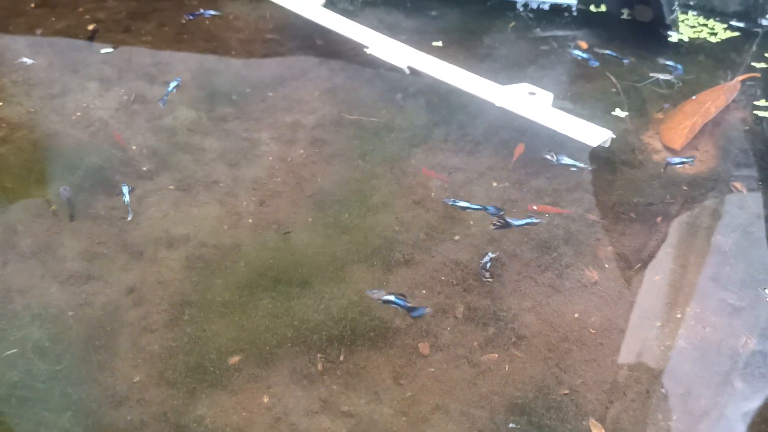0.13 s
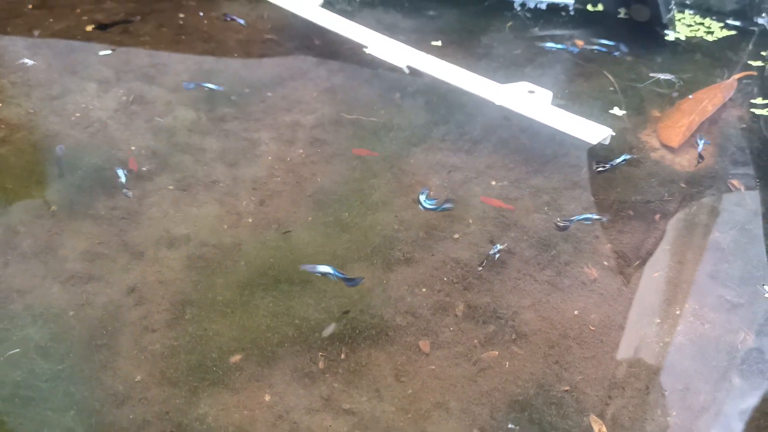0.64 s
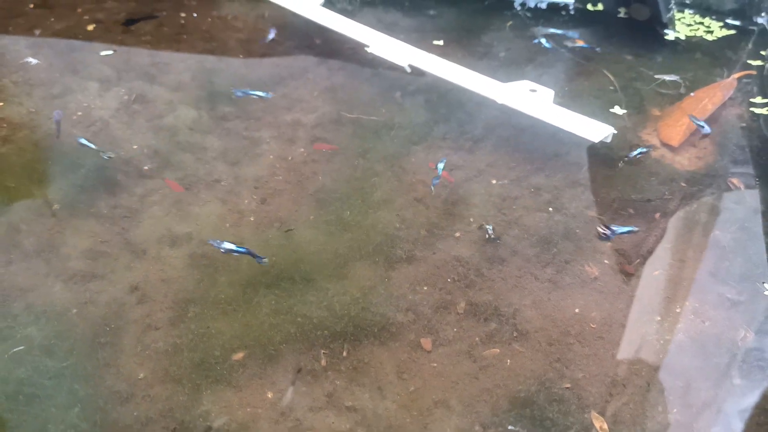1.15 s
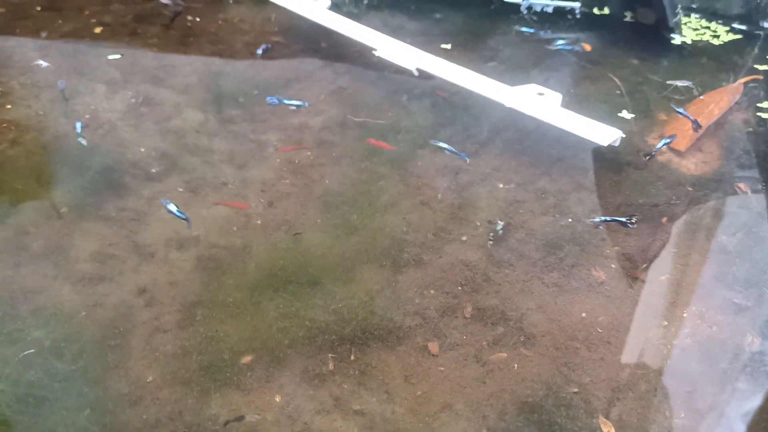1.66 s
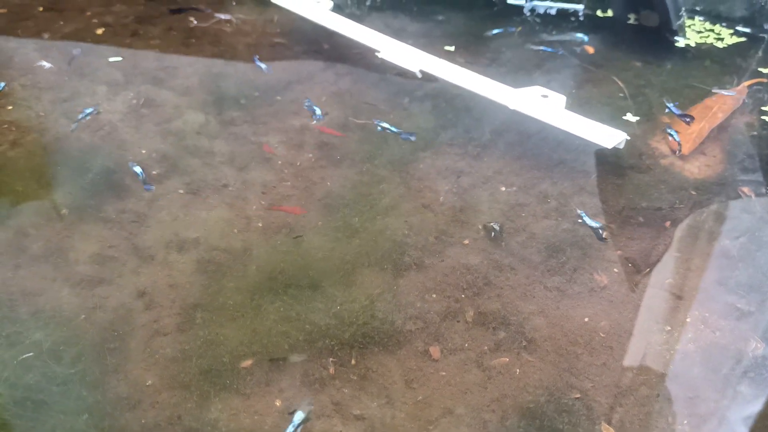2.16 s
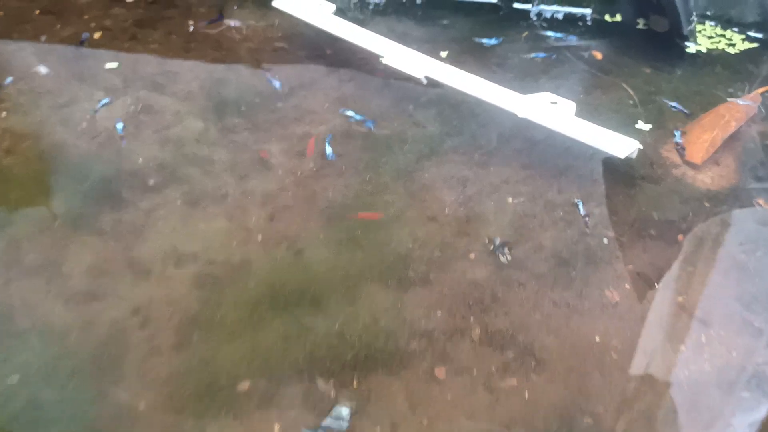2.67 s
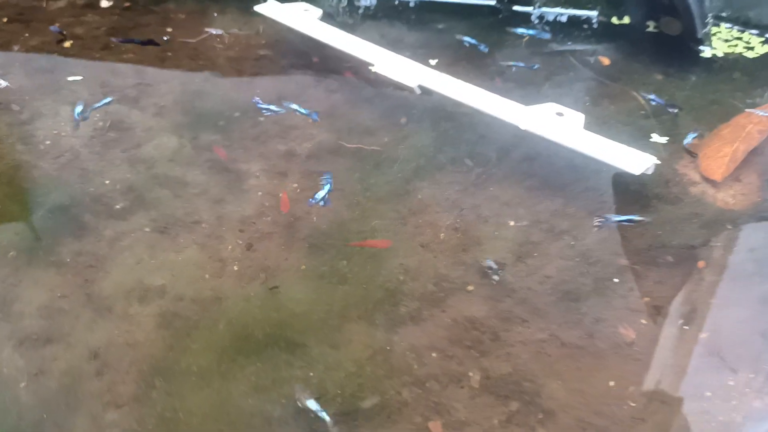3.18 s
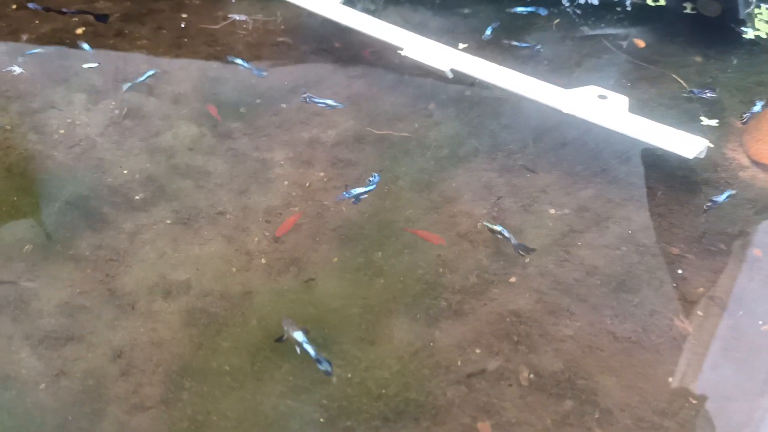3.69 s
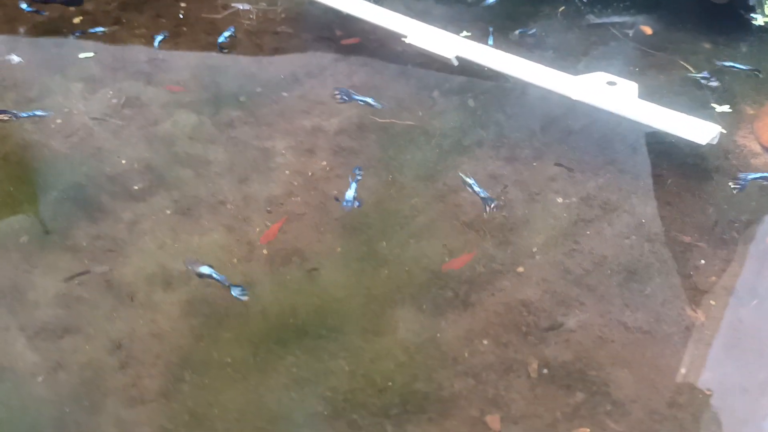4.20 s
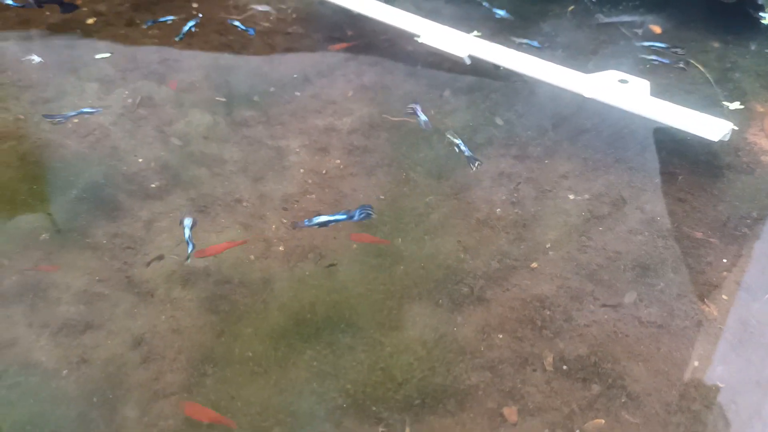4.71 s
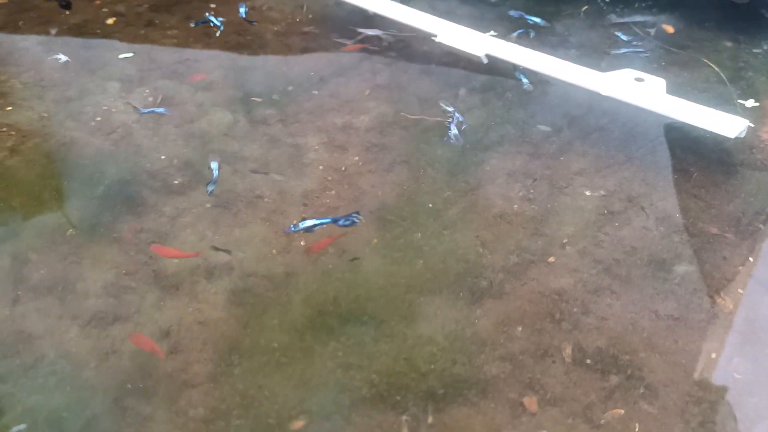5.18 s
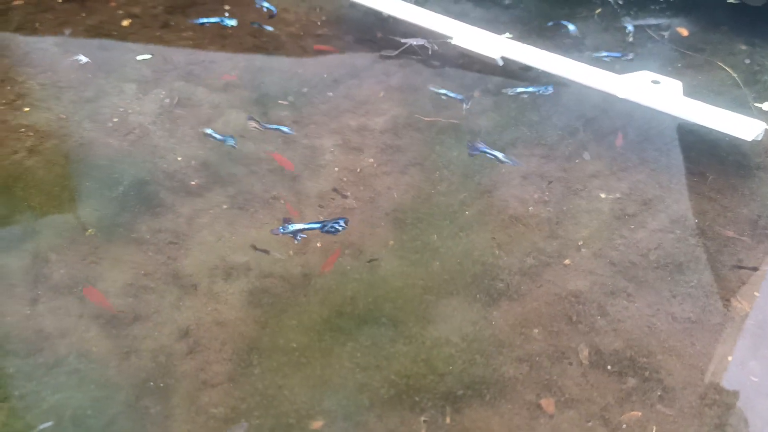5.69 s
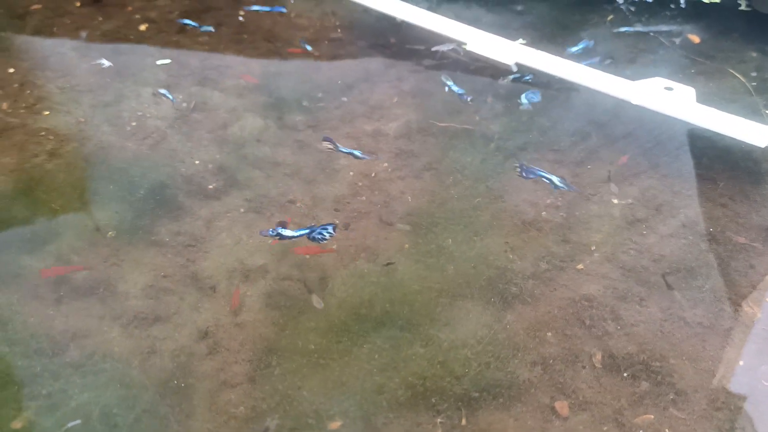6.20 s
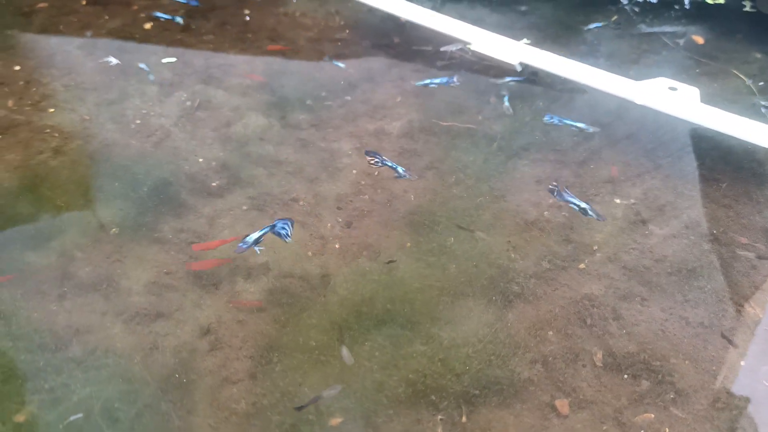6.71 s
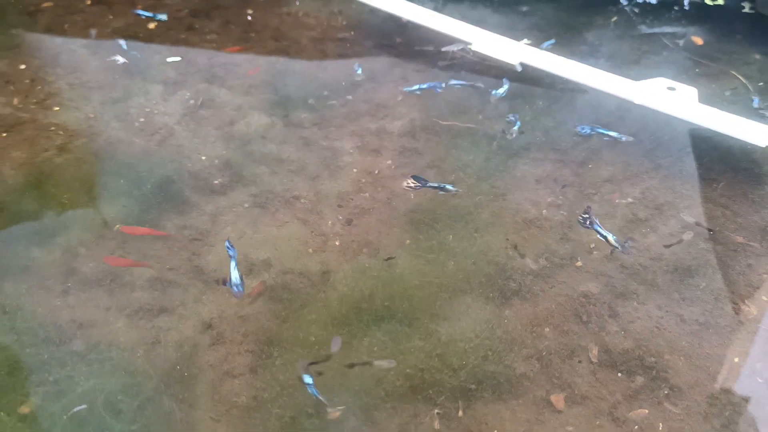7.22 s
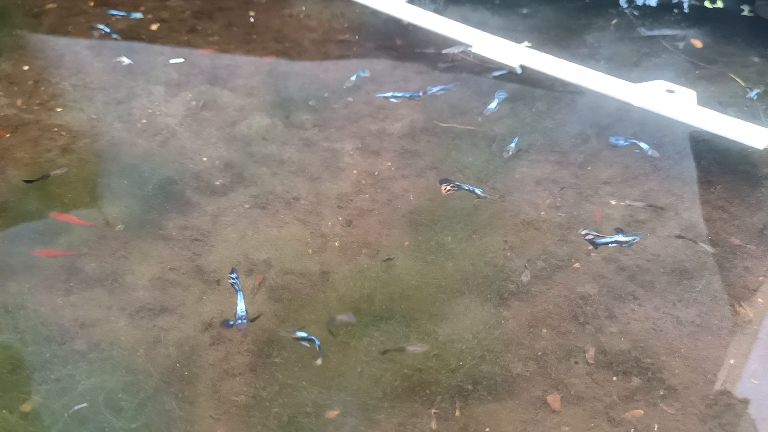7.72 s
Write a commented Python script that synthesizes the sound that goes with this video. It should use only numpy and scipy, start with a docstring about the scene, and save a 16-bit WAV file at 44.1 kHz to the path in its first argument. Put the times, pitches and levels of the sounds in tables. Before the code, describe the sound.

A handheld stereo microphone beside a garden pond picks up four crows in the trees. Their rattling, nasal caws start far away and spaced out, then come near and pile up until the end. Thin distant hoots sound early on; later, short chirps and steeply falling whistles from a small bird fit between the caws. A faint breeze lies underneath, with occasional muffled bumps. The fish make no distinct sound.

```python
"""Four crows caw in garden trees, far off at first, then close and overlapping, over a distant roosting flock.
Each caw is a rattling stack of harmonics mixed with noise, coloured by the resonances of throat and beak.
A small songbird drops falling whistles (gliding sines) between them; shaped noise makes light wind and air hiss.
Far thin hoots (sines), a brief high hiss and a few low thuds (filtered noise) come and go.
The left microphone port is shaded: birds sound duller and a little late there."""
import sys
import numpy as np
from scipy import signal
from scipy.fft import rfft, irfft
from scipy.io import wavfile
from scipy.ndimage import uniform_filter1d

SR = 44100
rng = np.random.default_rng(int(sys.argv[2]) if len(sys.argv) > 2 else 0)


def dump_mix(stems):
    """Bounce the given channels to the path in sys.argv[1] as a 16-bit WAV at rate SR."""
    frames = np.atleast_2d(stems).T  # one column per channel
    limited = np.clip(frames, -1, 1)  # hard clip at full scale
    pcm = np.round(limited * 32767).astype(np.int16)
    wavfile.write(sys.argv[1], SR, pcm)


def convert_level_to_amplitude(level_db):
    """Map a level in decibels to its linear amplitude factor."""
    exponent = np.asarray(level_db, float) / 20
    return 10 ** exponent


N = 346626  # length in samples
NEAR_S = 3.34  # the crows come close in the second after this


def evened(x):
    """Scales to rms 1."""
    return x / np.sqrt(np.mean(x ** 2) + 1e-20)


def read(points, hz):
    """Reads a table along log frequency."""
    f, value = np.transpose(points)
    return np.interp(np.log(hz + 1), np.log(f + 1), value)


def add(mix, s, sound):
    """Mixes a sound in at time s; whatever falls outside the mix is cut off."""
    at = round(s * SR)
    part, sound = mix[max(at, 0):], sound[max(-at, 0):]
    part[:len(sound)] += sound[:len(part)]


def span(length_s):
    """Progress from 0 to 1 through a sound of this length."""
    return np.arange(0, 1, 1 / (length_s * SR))


def tone(hz):
    """A sine of rms 1 that follows a moving pitch."""
    return np.sqrt(2) * np.sin(2 * np.pi * np.cumsum(hz) / SR)


def swell(u, crest, start, end, bend=2):
    """A curve over a span 0-1: from the start value to 0 at the crest, then on to the end value."""
    rise = start * (1 - u / crest) ** 2
    fall = end * abs((u - crest) / (1 - crest)) ** bend
    return np.where(u < crest, rise, fall)


def wobble(length, per_s):
    """Smooth random wander of rms 1."""
    size = max(int(SR / per_s), 2)
    noise = rng.standard_normal(length)
    return evened(uniform_filter1d(uniform_filter1d(noise, size), size))


def resonate(x, hz, width):
    """A steep moving resonance of gain 1: shift down, smooth twice, shift back."""
    turn = np.exp(2j * np.pi * np.cumsum(hz * np.ones(len(x))) / SR)
    r = np.exp(-np.pi * width / SR)
    smooth = signal.lfilter([(1 - r) ** 2], [1, -2 * r, r * r], x / turn)
    return 2 * (turn * smooth).real


def syrinx(hz, rattle_hz, depth, hoarse, bend=.062):
    """The bird's voice box: harmonics chopped and bent by a slower rattle, with noise puffs; also its lowest tones."""
    rattle = 2 * np.pi * np.cumsum(rattle_hz * (1 + .24 * wobble(len(hz), 50))) / SR
    steady = np.cumsum(hz * (1 + .012 * wobble(len(hz), 323))) / SR  # cycles, with a little pitch jitter
    turns = steady + np.cumsum(hz * bend * np.sin(rattle)) / SR
    stack = sum(np.cos(2 * np.pi * k * turns) for k in range(2, 13))
    # each puff is strongest as a cycle begins
    puffs = (1.5 + np.exp(-(turns % 1) / 0.38)) * rng.standard_normal(len(hz))
    voice = (1 - hoarse) * evened(stack) + hoarse * evened(puffs)
    low_tones = sum(gain * np.cos(2 * np.pi * k * steady) for k, gain in [(1, 1), (2, 1.6), (3, 1)])
    return voice * (1 + depth * np.cos(rattle)), low_tones * (1 + .35 * depth * np.cos(rattle))


def throat(drive, beak_db=0, size=1, mouth_db=0, nasal_db=0, hiss_db=0):
    """The open beak lifts the upper resonances; rushing air roughens those above 2 kHz and drives those above 4.7."""
    # crow throat before scaling: (frequency [Hz], width [Hz], level [dB], share that follows the beak [dB/dB])
    resonances = [(549, 198, -11.5, 0), (1318, 463, 2.5, 0), (1538, 594, 0, 0), (2300, 450, -20, 0),
                  (2950, 800, -19, 1.2), (3700, 680, -21, 3.5), (5160, 1660, -24.5, 2.5),
                  (7840, 2500, -40.5, 2.3), (9800, 2000, -39, 1.5), (13300, 3600, -49, -0.5)]
    mouth, nasal = 2, 5  # rows that ring in the mouth and through the nostrils
    strength = np.sqrt(abs(uniform_filter1d(drive ** 2, 1500)))
    rush = .5 * drive + 1.03 * rng.standard_normal(len(drive)) * strength
    rush *= convert_level_to_amplitude(2.4 * wobble(len(drive), 25))  # the rush comes in patches
    out = 0
    for k, (hz, width, db, share) in enumerate(resonances):
        gain_db = db + share * beak_db
        gain_db = gain_db + mouth_db * (k == mouth) + nasal_db * (k == nasal) + hiss_db * (hz > 7000)
        source = rush if hz > 4700 else drive + 0.47 * rush * (hz > 2000)
        # upper resonances follow the throat size only in part
        ring_hz = hz * size ** (1 if hz < 2600 else .5)
        out = out + (-1) ** k * convert_level_to_amplitude(gain_db) * resonate(source, ring_hz, width)
    return evened(out)


def crows():
    """Each caw swells, scoops up and sags; its lowest tones also leave through the chest wall."""
    # caws: (start [s], length [s], relative effort [dB], top pitch [Hz], beak opening [dB], crow [name])
    caws = [(-.06, 0.59, -62, 653, 1, "nasal"), (0.397, 0.44, -57.5, 602.5, -3, "nasal"),
            (0.678, 0.31, -62.5, 605, -9, "deep"), (1.084, 0.49, -56.5, 696, 3, "small"),
            (1.701, 0.45, -58.5, 629.6, 2, "small"), (1.998, 0.39, -57, 646, 3.5, "small"),
            (2.34, 0.51, -56.5, 611, 1.5, "nasal"), (2.76, 0.44, -56, 619, -0.5, "left"),
            (3.343, 0.49, -55.5, 610.3, 2, "left"), (3.889, 0.37, -47, 590.7, 0.5, "deep"),
            (4.675, 0.37, -42, 599, 0, "deep"), (5.269, 0.38, -42, 596.8, 1, "deep"),
            (5.321, 0.22, -40, 605.3, -1, "left"), (5.722, 0.39, -41, 661.7, -1, "nasal"),
            (5.879, 0.39, -42, 594.7, 0.5, "deep"), (6.08, 0.26, -38.5, 537.7, 1.5, "small"),
            (6.219, 0.36, -40.5, 653.3, 0, "nasal"), (6.478, 0.22, -45, 592.4, 1, "small"),
            (6.618, 0.44, -38.5, 638.7, -0.16, "nasal"), (7.068, 0.36, -35.5, 643, -1.5, "left"),
            (7.201, 0.28, -42, 601.4, -2, "deep"), (7.395, 0.14, -46.5, 603, 1, "left"),
            (7.573, 0.4, -44.5, 608, 0.2, "left")]
    # each crow's voice by name: (typical rattle rate [1/s], starting rattle depth [ratio],
    # resonance pitch factor for throat size [ratio], mouth ring [dB], nasal ring [dB], chest tone [dB],
    # hiss [dB], chest tone's rise in the closing glide [dB], lean to the left [dB])
    voices = {"deep": (98, 1, 1.056, -3, -4, -21.5, 3.5, 2.5, -0.5),
              "left": (92, 1.4, 1.0, -1, 1, -30, -0.5, -2, 5.5),
              "nasal": (88, 1.36, 1.2, -6, -1.5, -26.5, -1.5, -4, 3),
              "small": (89.5, 0.1, 1.32, -1, -2.5, -29, -1, -4, -1.5)}
    crest = .36  # share of the caw at which effort and pitch are at their top
    scoop, sag = .14, .6  # shares by which pitch lies under its top at the start and at the end
    droop = .14  # share by which the resonances sink as the throat lengthens
    far_hoarse, near_hoarse = .56, .29  # share of noise in the voice as a caw begins
    perches = {crow: np.zeros(N) for crow in voices}
    moods = rng.standard_normal(len(caws))
    for (s, length, peak_db, top_hz, beak_db, crow), mood in zip(caws, moods):
        rattle_hz, depth, size, mouth_db, nasal_db, chest_db, hiss_db, glide_db, _ = voices[crow]
        u = span(length)
        arch_db = swell(u, crest, -14.5, -24)
        waver = 1 + .022 * (1 - u ** 2) * wobble(len(u), 25.2)
        hz = top_hz * (1 - swell(u, crest, scoop, sag, bend=2.5)) * waver
        hoarse = far_hoarse + (near_hoarse - far_hoarse) * np.clip(s - NEAR_S, 0, 1)
        effort = 1 - .85 * u ** 3  # hoarseness and rattle clear as a caw ends
        drive, chest = syrinx(hz, rattle_hz * (1 + .1 * mood), depth * effort, hoarse * effort, .065 * effort)
        beak = beak_db + swell(u, crest, 1.5, 1.5)
        moving_size = size * (1 - swell(u, crest, droop / 2, droop))
        rasp = throat(drive, beak, moving_size, mouth_db, nasal_db, hiss_db)
        rasp = convert_level_to_amplitude(arch_db + 1.5 * wobble(len(u), 36)) * rasp  # flutter
        # the chest tone outlasts the rasp and holds up as the pitch sags
        slack = np.sqrt(top_hz / hz) * convert_level_to_amplitude(glide_db * u ** 4) * signal.windows.tukey(len(u), .15)
        chest = convert_level_to_amplitude(arch_db / 2 + chest_db + 1.3 * wobble(len(u), 40)) * slack * chest
        caw = convert_level_to_amplitude(peak_db) * (rasp + chest)
        add(perches[crow], s, caw * signal.windows.tukey(len(u), .12))
    return [(perch, voices[crow][-1]) for crow, perch in perches.items()]


def flock(count=70):
    """Many far caws, loosely spaced in time, each arching up and falling away."""
    # loudness of the distant flock: (time [s], relative level [dB])
    flock_levels = [(0, -60), (4.6, -60), (5.7, -60), (5.95, -46), (6.9, -45), (7.05, -52), (7.3, -47),
                    (7.86, -49)]
    drive, u = np.zeros(N), np.linspace(0, 1, SR // 3)
    for k, (late, pitch, rattle, loud) in enumerate(rng.random((count, 4))):
        hz = (520 + 190 * pitch) * (1 - .5 * (u - .35) ** 2)
        voice, _ = syrinx(hz, 80 + 40 * rattle, 0.74, 0.68)
        caw = voice * np.sin(np.pi * u) * convert_level_to_amplitude(1.4 * loud)
        add(drive, (k + late - 2) * N / SR / (count - 2), caw)
    return throat(drive, -1.7) * convert_level_to_amplitude(np.interp(np.arange(N) / SR, *np.transpose(flock_levels)))


def air():
    """Hiss built from random spectra, with soft patches; gusts of wind move mainly the lows, below about 170 Hz."""
    # colour of the air: (frequency [Hz], relative level [dB])
    air_colour = [(12, -7.5), (20, -5.5), (50, -1), (100, -7), (200, -16), (360, -20), (520, -17),
                  (800, -18.5), (2400, -16), (3800, -15.5), (7200, -34.5), (10000, -39), (15200, -37.5)]
    # left port against right: (frequency [Hz], level [dB])
    left_colour = [(60, 1.5), (110, 3.5), (200, -9), (380, -5), (690, -20), (1280, -71), (2360, -16.5),
                   (4350, -22), (8030, -7), (14800, -3.5)]
    # left-right likeness, limited to -1..1 below: (frequency [Hz], likeness [ratio])
    likeness = [(60, 0.5), (180, 0.68), (540, 0.2), (1630, -8), (4920, -0.13), (14800, 0)]
    frames, hz = N // 256 + 5, np.fft.rfftfreq(1024, 1 / SR)
    a, b, c, d, patches = rng.standard_normal((frames, 513, 5)).T
    patches = evened(uniform_filter1d(uniform_filter1d(patches, 12, 0), 14, 1))
    t = np.arange(frames) * 256
    # gusts wander about 4 times per second while the wind freshens by .45 dB per second
    gust_db = .5 * wobble(frames * 256, 4)[t] + .45 * t / SR
    gust_db = (gust_db - gust_db.mean()) / (1 + (hz[:, None] / 170) ** 4)
    same = np.clip(read(likeness, hz), -1, 1)[:, None]
    right = a + 1j * b
    left = same * right + np.sqrt(1 - same ** 2) * (c + 1j * d)
    z = np.array([left, right])
    patches_db = 2.1 * patches * (hz / (hz + 250))[:, None]
    z *= convert_level_to_amplitude(read(air_colour, hz)[:, None] + patches_db + gust_db)
    z[0] *= convert_level_to_amplitude(read(left_colour, hz))[:, None]
    hiss = signal.istft(z, nperseg=1024, noverlap=768)[1][:, :N]
    return convert_level_to_amplitude(-57) * evened(hiss)


def songbird():
    """Burry whistles; the plunges dive fast, then slide on down and fade."""
    # plunges, all of one length and landing on one pitch: (start [s], top pitch [Hz], relative level [dB])
    plunges = [(3.311, 6240, -58), (3.605, 6430, -56), (3.906, 5960, -58), (4.195, 6270, -57.5),
               (4.483, 6110, -56.5), (4.79, 6340, -59.5), (5.656, 6200, -58), (5.943, 6230, -58.5),
               (6.558, 6030, -58.5), (7.457, 5900, -63)]
    # other notes: (start [s], length [s], first pitch [Hz], last pitch [Hz], relative level [dB])
    other_notes = [(0.0, 0.029, 2740, 2790, -61), (0.534, 0.057, 3790, 3700, -62.5),
                   (0.6, 0.056, 3400, 2880, -69), (0.668, 0.025, 2820, 2830, -62),
                   (1.448, 0.072, 4160, 4120, -69.5), (2.69, 0.039, 3700, 3520, -61),
                   (2.717, 0.036, 3380, 2785, -58.5), (2.909, 0.13, 3480, 3560, -67),
                   (3.004, 0.041, 2650, 2650, -62), (3.066, 0.045, 2864, 2900, -62),
                   (3.618, 0.068, 2950, 2930, -63), (3.69, 0.037, 2600, 2730, -60),
                   (3.72, 0.05, 2894, 2930, -58), (3.962, 0.062, 3150, 2980, -64),
                   (4.03, .1, 5700, 5500, -69), (4.076, 0.017, 2640, 2700, -55.5),
                   (4.141, 0.028, 2950, 2940, -57), (4.312, 0.074, 3700, 3475, -63),
                   (4.412, 0.014, 2770, 2670, -56), (4.468, 0.037, 2910, 2920, -58),
                   (4.574, 0.054, 4700, 4160, -60), (4.638, 0.056, 4250, 3760, -57),
                   (4.723, 0.051, 3900, 6000, -68), (4.984, 0.13, 4650, 3726, -63),
                   (5.114, 0.13, 3750, 3610, -64), (4.96, 0.12, 2700, 3084, -62),
                   (5.327, 0.19, 2810, 3120, -56), (5.385, 0.018, 4580, 3900, -64),
                   (5.615, 0.051, 3940, 3590, -60.5), (5.7, 0.03, 2680, 2780, -59),
                   (6.397, 0.046, 2420, 2400, -50.5), (6.244, 0.095, 3745, 3700, -56.5),
                   (6.679, 0.13, 3700, 3760, -53), (7.184, 0.033, 3770, 3800, -51.5),
                   (7.361, 0.05, 3630, 3614, -53)]
    plunge_s, dive_s = 0.1044, 0.048
    knee_hz, land_hz, land_db = 3800, 3610, -5.5  # dive to the knee, then slide to the landing
    out = np.zeros(N)
    t = np.arange(0, plunge_s, 1 / SR)
    whistles = [(s, np.linspace(first_hz, last_hz, round(length * SR)), db)
                for s, length, first_hz, last_hz, db in other_notes]
    for s, top_hz, db in plunges:
        hz = np.interp(t, [0, dive_s, plunge_s], [top_hz, knee_hz, land_hz])
        whistles.append((s, hz, db + land_db * t / plunge_s))
    for s, hz, db in whistles:
        hz = hz * (1 + .032 * wobble(len(hz), 600))
        burr = 1 + .3 * wobble(len(hz), 500)
        add(out, s, convert_level_to_amplitude(db) * burr * tone(hz) * signal.windows.tukey(len(hz), .5))
    return out


def hoots():
    """Thin wavering tones that scoop up and slide gently down."""
    # hoots: (start [s], length [s], top pitch [Hz], relative level [dB])
    calls = [(.72, .2, 820, -74), (1.05, .14, 920, -74.5), (1.22, .2, 820, -73.5), (1.38, .22, 920, -74.5),
             (1.84, .9, 830, -72.5)]
    crest = .22  # share of the hoot at which the pitch is at its top
    out = np.zeros(N)
    for s, length, top_hz, db in calls:
        u = span(length)
        hz = top_hz * (1 - swell(u, crest, .15, .11)) * (1 + 0.0088 * wobble(len(u), 51))
        level = convert_level_to_amplitude(db + swell(u, crest, 0, -5) + 2.2 * wobble(len(u), 29))
        add(out, s, level * tone(hz) * signal.windows.tukey(len(u), .1))
    return out


def thuds():
    """Noise bursts ring in a small hollow close to the microphone, louder on the right."""
    # thuds: (start [s], length [s], relative peak level [dB])
    bursts = [(3.61, 0.31, -51), (5.8, 0.18, -59.5), (7.3, 0.3, -56)]
    # the hollow's resonances: (frequency [Hz], width [Hz], level [dB])
    hollow = [(168, 42, -5.5), (312.5, 79, -1), (520, 260, -4)]
    out = np.zeros(N)
    for s, length, peak_db in bursts:
        u = span(length)
        push = rng.standard_normal(len(u))
        ring = sum(convert_level_to_amplitude(d) * evened(resonate(push, hz, width)) for hz, width, d in hollow)
        db = peak_db + swell(u, 0.21, -26, -21.5)
        add(out, s, convert_level_to_amplitude(db) * evened(ring) * signal.windows.tukey(len(u), .1))
    return out * convert_level_to_amplitude([[-2.5], [2.5]])


def sizzle():
    """A patchy puff of high hiss among the caws, made of noise through one wide resonance."""
    # one puff: (start [s], length [s], frequency [Hz], width [Hz], relative level [dB])
    s, length, hz, width, db = (6.45, .48, 8800, 3000, -72.5)
    out, size = np.zeros(N), round(length * SR)
    puff = evened(resonate(rng.standard_normal(size), hz, width))
    add(out, s, convert_level_to_amplitude(db + 7.2 * wobble(size, 40)) * puff * np.hanning(size))
    return out


def garden(x, wet_db):
    """Direct sound and scattered echoes off trees and walls, other taps at each port."""
    # how long echoes last: (frequency [Hz], time to fall by 60 dB [s])
    echo_times = [(500, .3), (1500, .45), (4000, .42), (9000, .28)]
    left_late = 13  # samples
    taps = np.zeros((2, SR))
    at = np.arange(200, SR - 20, 20) + rng.integers(0, 20, (2, (SR - 201) // 20))
    np.put_along_axis(taps, at, rng.choice([-1., 1.], at.shape), 1)
    hz, t, z = signal.stft(taps, SR, nperseg=256)
    fade = convert_level_to_amplitude(-60 * t / read(echo_times, hz)[:, None])
    tail = signal.istft(z * fade, SR, nperseg=256)[1]
    tail *= convert_level_to_amplitude(wet_db) / np.linalg.norm(tail[0])
    # direct sound: weaker and later at the left port
    tail[0, left_late] += 0.3
    tail[1, 0] += 1
    left, right = rfft(tail / np.linalg.norm(tail, axis=1)[:, None])
    f = np.fft.rfftfreq(tail.shape[1], 1 / SR)
    alike = .8 / (1 + (f / 850) ** 6)  # long waves reach both ports much alike
    delayed = right * np.exp(-2j * np.pi * f * left_late / SR)
    left = alike * delayed + np.sqrt(1 - alike ** 2) * left
    return signal.fftconvolve(x[None], irfft([left, right], tail.shape[1]), axes=1)[:, :N]


def scene():
    """Birds through the garden and the shaded port, over air and thuds near the ports."""
    # birds at the left port against the right: (frequency [Hz], level [dB])
    shade_levels = [(60, 0), (110, 22), (200, 12.5), (380, -2), (690, -10), (1280, -13.5), (2360, -21),
                    (4350, -34), (8030, -27), (14800, -8)]
    near = np.clip(np.arange(N) / SR - NEAR_S, 0, 1)
    # the number after each sound is the level of its echoes in dB
    birds = garden(hoots(), 0.5) + garden(songbird() + sizzle(), 3.2) + garden(flock(), 3.4)
    for perch, lean_db in crows():
        heard = garden(perch * near, -4) + garden(perch * (1 - near), 0)
        birds += heard * convert_level_to_amplitude([[lean_db], [0]])
    hz = np.arange(2049) * SR / 4096
    shade = np.roll(irfft(convert_level_to_amplitude(read(shade_levels, hz))), 2048) * np.hanning(4096)
    birds[0] = signal.oaconvolve(birds[0], shade)[2048:][:N]  # trims the filter's own delay
    return convert_level_to_amplitude(7.5) * birds + air() + thuds()


def roll_off(x):
    """The treble ends steeply here."""
    return signal.sosfilt(signal.butter(12, 15300, fs=SR, output="sos"), x)


def record(dry):
    """Turns the finished mix into the sound that is written out."""
    return roll_off(dry)


dry = scene()
out = record(dry)
dump_mix(out)
```